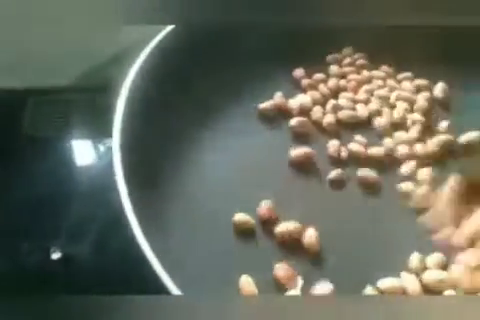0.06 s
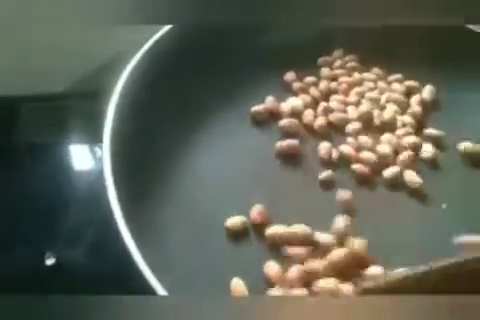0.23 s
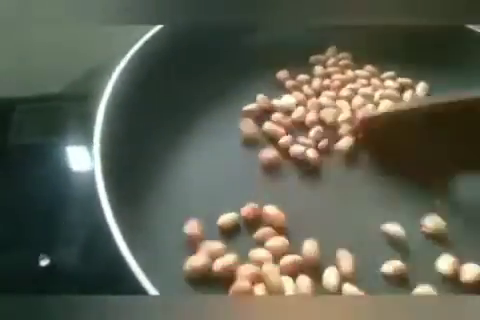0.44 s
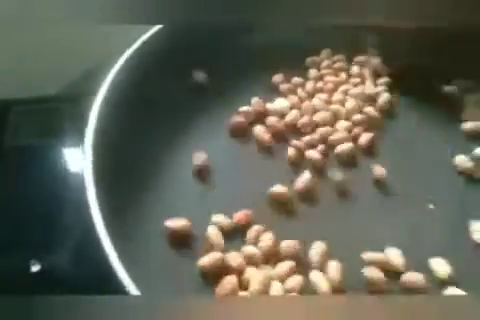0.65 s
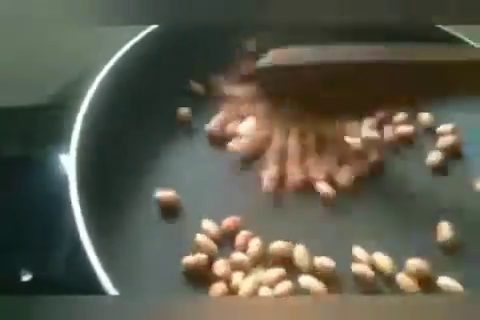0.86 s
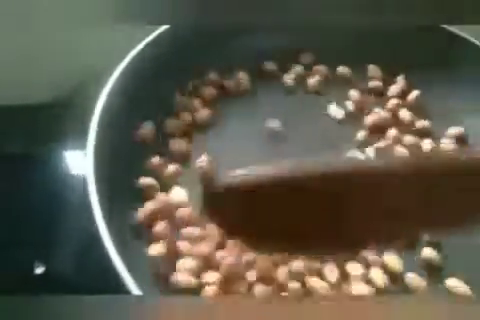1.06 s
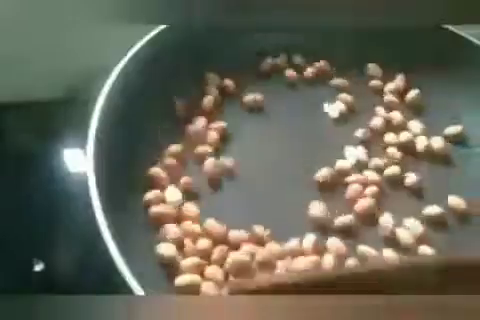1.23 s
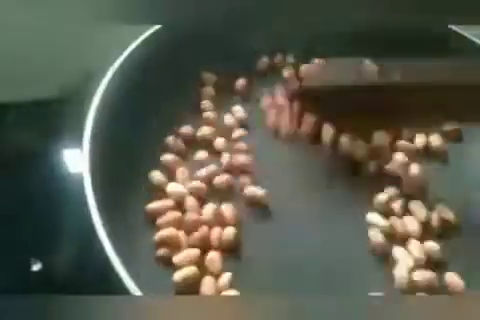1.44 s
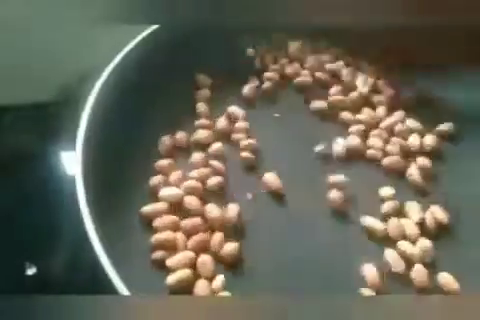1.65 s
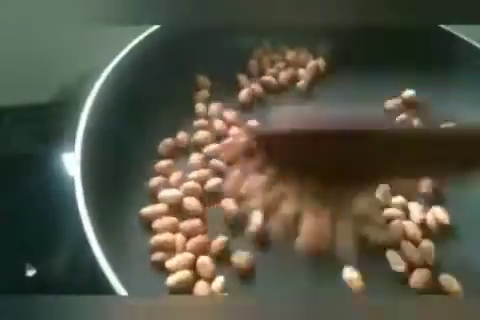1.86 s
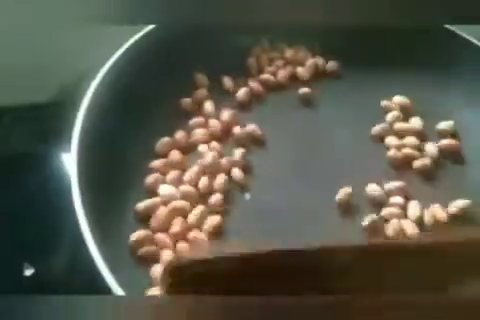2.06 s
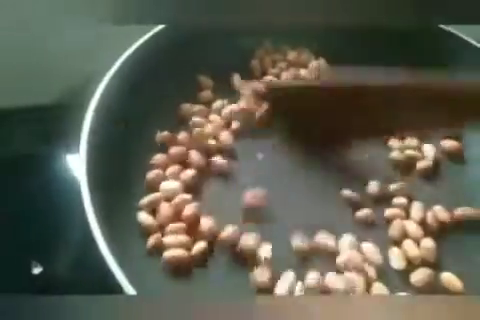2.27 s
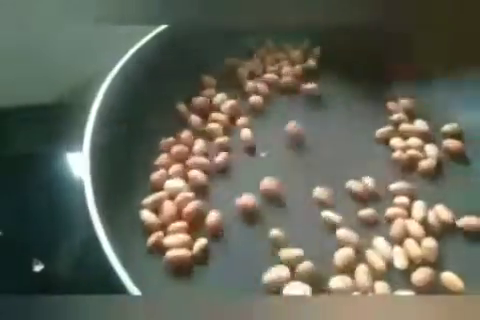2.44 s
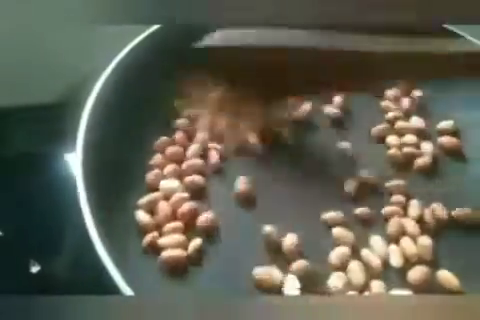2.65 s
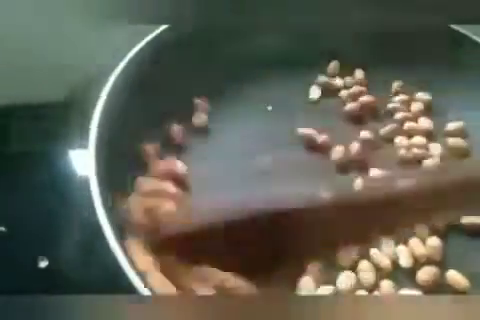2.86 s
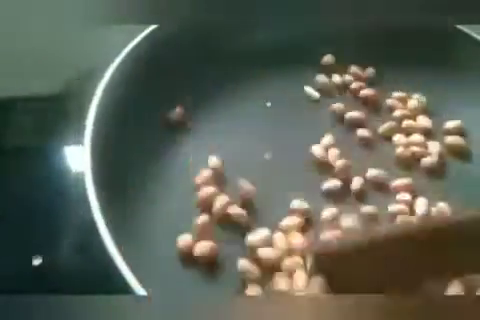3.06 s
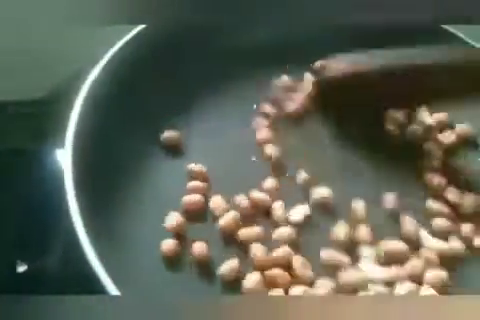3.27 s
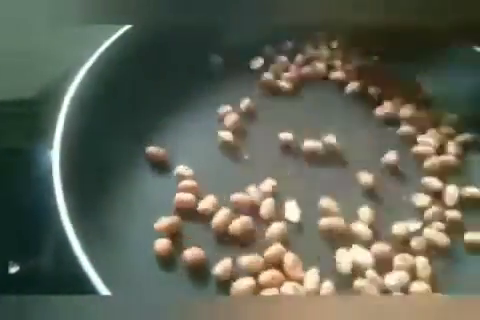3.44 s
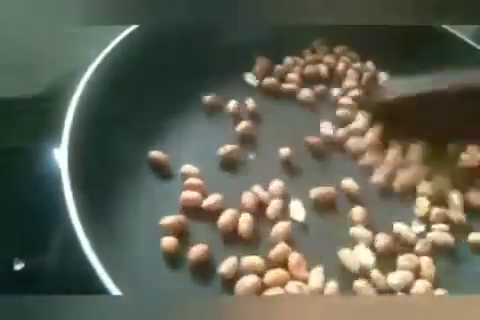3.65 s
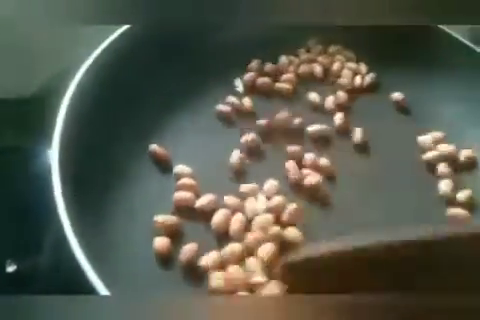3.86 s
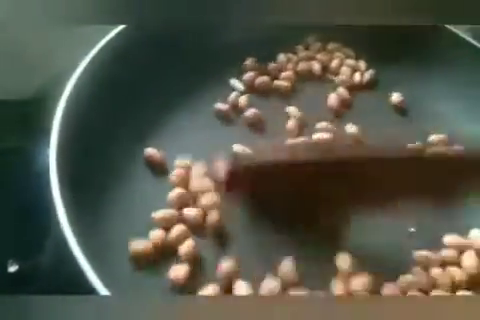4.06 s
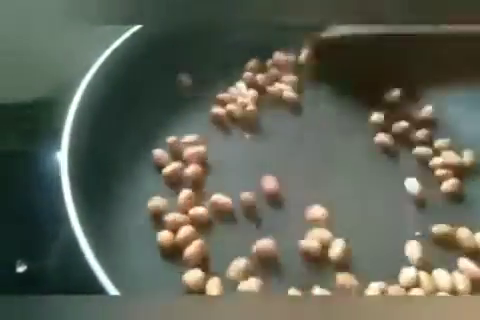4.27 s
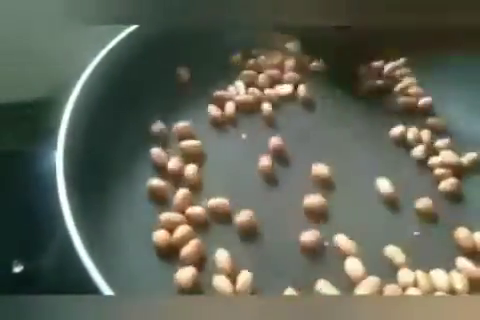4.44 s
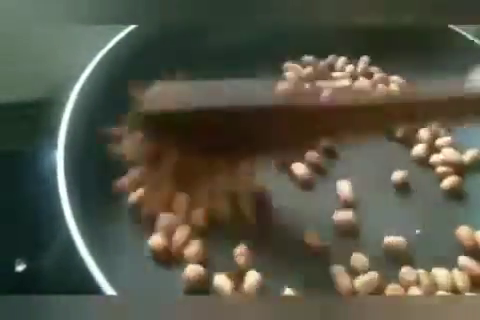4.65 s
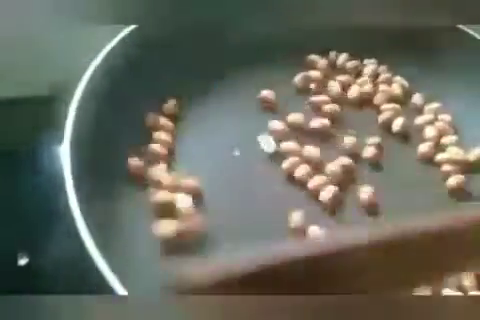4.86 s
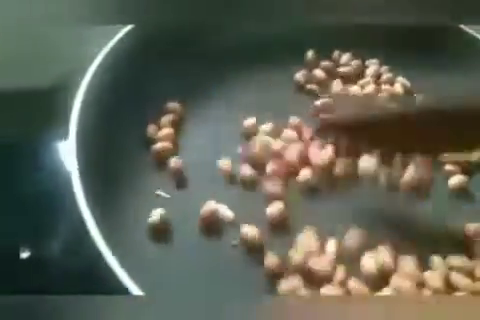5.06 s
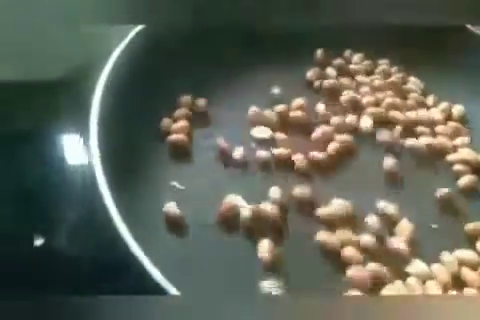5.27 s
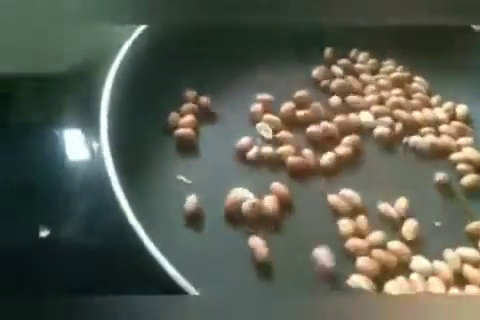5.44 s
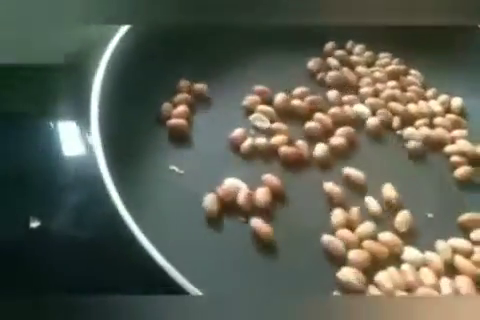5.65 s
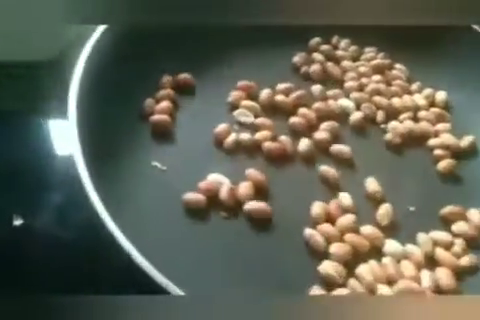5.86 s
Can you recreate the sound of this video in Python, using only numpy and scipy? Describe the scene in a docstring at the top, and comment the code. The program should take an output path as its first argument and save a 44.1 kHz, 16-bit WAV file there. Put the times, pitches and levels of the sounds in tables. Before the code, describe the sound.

Heard very close in a small kitchen: roasting nuts scrape, rustle and rattle over a metal pan in regular quick strokes. The blade knocks and clonks on the pan wall, with tiny squeaks, bright ticks and faint pings, while the pan grumbles low on the hob. At the end the clatter thins, cuts off, and a single light nut taps several times before near silence.

```python
"""Peanuts roast in a coated frying pan: from the start a spatula strokes them about twice a second.
Each stroke scrapes with fine hiss and husk rustle, then the heap topples in a clatter of ringing contacts.
Along the way the blade knocks, bangs and pings the pan, skids squeak or tick and the pan grumbles on the hob.
The stirring ends, the tumbling is cut off and a last nut bounces. Small kitchen, heard close.
Noise bursts and damped sines make the contacts, random impulses repeat them, and a short reverb follows."""
import sys
import numpy as np
from scipy import signal
from scipy.fft import rfft, irfft, next_fast_len
from scipy.io import wavfile
from scipy.ndimage import uniform_filter1d, map_coordinates

SR = 44100
rng = np.random.default_rng(int(sys.argv[2]) if len(sys.argv) > 2 else 0)


def put_to_file(sound):
    """Save the sound as 16-bit audio at rate SR, in the file named by the first command-line argument."""
    columns = np.atleast_2d(sound).T  # one column per channel
    safe = np.clip(columns, -1, 1)
    whole_steps = np.round(safe * 32767)
    wavfile.write(sys.argv[1], SR, whole_steps.astype(np.int16))


N = 260631  # length [samples]


def amp(db):
    """Decibels to gain."""
    return 10 ** (np.asarray(db) / 20)


def unit(x):
    """Scale to rms 1."""
    return x / np.sqrt(np.mean(x ** 2) + 1e-20)


def together(levels_db):
    """Level of several sounds heard at once, summed as powers [dB]."""
    power = np.sum(amp(levels_db) ** 2, axis=0)
    return 10 * np.log10(power + 1e-12)


def along(points, hz):
    """Read (frequency [Hz], value) points on a log frequency axis."""
    f, value = np.transpose(points)
    return np.interp(np.log(hz + 1), np.log(f + 1), value)


def wobble(rate):
    """A smooth random curve with rate knots a second."""
    knots = rng.standard_normal(int(N * rate / SR) + 4)
    return map_coordinates(knots, [np.arange(N) * rate / SR])


def swell(start, hold, rise_db_per_s, fall_db_per_s):
    """An envelope in dB that climbs to 0 at start [s], holds [s] and falls."""
    t = np.arange(N) / SR - start
    rise = rise_db_per_s * t
    fall = fall_db_per_s * (hold - t)
    return np.minimum(0, np.minimum(rise, fall))


def coloured(x, spectrum):
    """Minimum-phase filter with the gain of (frequency [Hz], gain [dB]) points: no pre-echo."""
    n = x.shape[-1]
    m = 2 * next_fast_len(n // 2 + 2048)
    gain = amp(along(spectrum, np.fft.rfftfreq(m, 1 / SR)))
    cepstrum = irfft(np.log(gain))
    cepstrum[1:m // 2] *= 2  # fold the cepstrum onto positive time
    cepstrum[m // 2 + 1:] = 0
    return irfft(rfft(x, m) * np.exp(rfft(cepstrum)))[..., :n]


def add(track, s, sound):
    """Mix a sound into the track from time s."""
    part = track[max(round(s * SR), 0):][:len(sound)]
    part += sound[:len(part)]


def ring_time():
    """Time axis of one blow, 0.2 s."""
    return np.arange(SR // 5) / SR


def burst(t60):
    """Noise of energy 1 that dies away by 60 dB in t60 [s]."""
    t = ring_time()
    x = rng.standard_normal(len(t)) * amp(-60 * t / t60)
    return x / np.linalg.norm(x)


def ring(modes, scatter_db, detune=0.0037):
    """Damped modes, each with a new strength and sign; the load of the nuts detunes them a little."""
    t = ring_time()
    hz, db, t60 = np.transpose(modes)[:, :, None]
    sign = rng.choice([-1, 1], hz.shape)
    gain = sign * amp(db + scatter_db * rng.standard_normal(hz.shape))
    hz = hz * (1 + detune * rng.standard_normal(hz.shape))
    return np.sum(gain * np.sin(2 * np.pi * hz * t) * amp(-60 * t / t60), axis=0)


def strike(modes, spectrum, click_t60, ring_db, snap):
    """A blow of energy 1 at one spot of the pan: a first snap, a short clatter and the ring."""
    tone = ring(modes, scatter_db=3.5, detune=0.01215)
    blow = burst(click_t60) + amp(ring_db) * tone / np.linalg.norm(tone)
    blow[0] += snap
    blow = coloured(blow, spectrum)
    return blow / np.linalg.norm(blow)


def contacts(rate, spread_db):
    """Random impulses of uneven size and mean power 1, rate a second."""
    size = unit(amp(spread_db * np.clip(rng.standard_normal(N), -2, 2)))
    chance = np.clip(rate / SR, 1e-6, 1)
    happens = rng.random(N) < chance
    return happens * size * rng.choice([-1, 1], N) / np.sqrt(chance)


def wandering(rate, depth_db, count):
    """The action moves between spots of the pan: one gain curve for each, total power 1."""
    knots = amp(depth_db * rng.standard_normal((count, int(N * rate / SR) + 2)))
    at = np.arange(N) * rate / SR
    gains = np.array([np.interp(at, np.arange(len(k)), k) for k in knots])
    return gains / np.linalg.norm(gains, axis=0)


# resonance of the finest hiss: height [dB], half width [Hz]
FINE_PEAK_DB, FINE_WIDTH_HZ = 1.5, 1200


def shifting(x, patchy_db, centre_hz=None):
    """The colour changes as the contact moves: random gain patches and, if centred, a moving resonance."""
    hz, t, z = signal.stft(x, SR, nperseg=512)
    field = rng.standard_normal(z.shape)
    for _ in range(2):
        field = uniform_filter1d(field, size=5, axis=0)
        field = uniform_filter1d(field, size=11, axis=1)
    gain_db = patchy_db * unit(field)
    if centre_hz is not None:
        centre = np.interp(t, np.arange(N) / SR, centre_hz)
        gain_db = gain_db + FINE_PEAK_DB / (1 + ((hz[:, None] - centre) / FINE_WIDTH_HZ) ** 2)
    return signal.istft(z * unit(amp(gain_db)), SR, nperseg=512)[1][:N]


# colour of the kitchen's background: (frequency [Hz], gain [dB])
KITCHEN_COLOUR = [(25, -30), (72, 6), (100, 6.5), (140, 0.5), (215, 11.5), (310, -2.5), (430, -20.5),
                  (1000, -34), (4000, -25.5), (16000, -23)]


def kitchen_tone():
    """A steady bed of noise, strongest in the lows."""
    return amp(-54.0) * unit(coloured(rng.standard_normal(N), KITCHEN_COLOUR))


# reverberation of the kitchen: (frequency [Hz], t60 [s])
KITCHEN_REVERB = [(200, 0.63), (1500, 0.2), (10000, 0.089)]


def room(x):
    """The kitchen's short reverberation, duller as it fades: decaying noise convolved with the sound."""
    hz, t, z = signal.stft(rng.standard_normal(SR // 2), SR, nperseg=256)
    t60 = along(KITCHEN_REVERB, hz)[:, None]
    tail = signal.istft(z * amp(-60 * t / t60), SR, nperseg=256)[1]
    return signal.oaconvolve(x, tail / np.linalg.norm(tail))[:N]


# colour of the pan grumbling on the hob: (frequency [Hz], gain [dB])
GRUMBLE_COLOUR = [(25, -32.5), (45, -36.5), (85, -10.5), (115, -9.5), (150, -22), (195, -2.5), (232, 3),
                  (275, -3.5), (320, 2), (410, -13.5), (600, -6.5), (1200, -23)]
# colour of the pan rubbing on the hob: (frequency [Hz], gain [dB])
RUB_COLOUR = [(40, -42), (90, -12.5), (135, -6.5), (170, -10.5), (200, 3.5), (235, 1.5), (275, -1.5),
              (320, 1.5), (440, -14), (620, -11.5), (1500, -38)]
# the pan is shoved a little way over the hob: (time [s], length [s], level [dB])
SHOVE = (3.44, 0.165, -37)
SHOVE_EDGE_DB_PER_S = 600
DRAG_DB, DRAG_FOLLOWS = -49, 0.8  # grumble at median sliding [dB]; dB gained for each dB of sliding


def dragging(slide_db):
    """The pan grumbles unevenly on the hob under each stroke, and rubs with a soft low hum when shoved."""
    s, length, shove_db = SHOVE
    stroke_db = DRAG_DB + DRAG_FOLLOWS * (slide_db - np.median(slide_db))
    grumble = unit(coloured(contacts(400, spread_db=3.5), GRUMBLE_COLOUR))
    rub = unit(coloured(contacts(1500, spread_db=1.5), RUB_COLOUR))
    shove = swell(s, length, SHOVE_EDGE_DB_PER_S, SHOVE_EDGE_DB_PER_S)
    return amp(stroke_db + 3.4 * wobble(25)) * grumble + amp(shove_db + shove) * rub


# brief squeaky skids and pitched ticks: (middle [s], level [dB], centre [Hz],
# width at half amplitude [Hz], half length [s], left-right difference [dB])
SKIDS_AND_TICKS = [(0.136, -23, 13700, 1490, 0.0021, -7.5), (0.42, -24.5, 5100, 502, 0.0025, -52),
                   (1.5, -24, 3250, 300, 0.0041, -56), (1.929, -25.5, 5930, 4980, 0.0036, -55),
                   (1.941, -28, 4900, 4430, 0.0041, -56), (1.963, -31.5, 13180, 4000, 0.0023, -27),
                   (2.009, -22, 8860, 1400, .0037, -57), (2.619, -26, 13000, 6000, 0.00082, -31),
                   (2.835, -28.5, 7000, 3510, 0.0031, -49), (2.917, -28, 7700, 1203, 0.0012, -51),
                   (3.442, -31, 8450, 2520, 0.0025, -48), (3.744, -32.5, 12000, 2500, 0.0046, -29),
                   (4.333, -25.5, 12200, 6000, 0.00069, 2.5), (4.359, -25, 9100, 3530, 0.007, 2),
                   (4.816, -26, 7000, 3940, 0.0019, -50), (4.963, -30.5, 7930, 3110, 0.0045, -50)]


def skids_and_ticks():
    """Brief squeaky skids and pitched ticks, as milliseconds of band noise: mid and side."""
    mid, side, t = np.zeros(N), np.zeros(N), ring_time()
    f, middle = np.fft.rfftfreq(len(t), 1 / SR), t.mean()
    for s, db, hz, width_hz, length, side_db in SKIDS_AND_TICKS:
        band = 1 / (1 + (2 * (f - hz) / width_hz) ** 2)
        noise = rng.standard_normal((2, len(t)))
        chirp = unit(irfft(rfft(noise) * band, len(t)))
        chirp = chirp * amp(db) * np.exp(-((t - middle) / length) ** 2 / 2)
        add(mid, s - middle, chirp[0])
        add(side, s - middle, amp(side_db) * chirp[1])
    return mid, side


# high modes of the pan wall: (frequency [Hz], level [dB], t60 [s])
RIM_MODES = [(2686, 0.5, 0.059), (3303, 0.5, 0.13), (4040, -3, 0.092), (4790, -14.5, 0.15),
             (5480, -2.5, 0.14), (6260, 1, 0.15), (7170, 2, 0.12), (8440, 3, 0.13), (9300, -3, 0.13),
             (10200, -4, 0.15)]
# the spatula's edge clips the pan wall: (time [s], level [dB], tilt about 6 kHz [dB per octave])
PINGS = [(1.172, -48.5, 0), (2.005, -38, -6.5), (2.829, -46.5, -5), (3.59, -40, 1.5)]
# ring added while the edge bites [dB relative to the ring], and its time constant [s]
PING_BITE_DB, PING_BITE_S = 9, 0.004


def pings():
    """The wall's high modes sound loudly while the edge bites, then ring on thinly."""
    out, t = np.zeros(N), ring_time()
    bite = 1 + amp(PING_BITE_DB) * np.exp(-t / PING_BITE_S)
    for s, db, tilt_db in PINGS:
        modes = [(hz, level + tilt_db * np.log2(hz / 6000), t60) for hz, level, t60 in RIM_MODES]
        add(out, s, amp(db) * bite * ring(modes, scatter_db=3.5, detune=0.0014))
    return out


# modes of the pan: (frequency [Hz], level [dB], t60 [s])
PAN_MODES = [(720, -5, 0.078), (810, -4, 0.063), (903, -6.5, 0.1), (978, -7.5, 0.071), (1069, -11, 0.11),
             (1256, -3.5, 0.067), (1291, 1.5, 0.053), (1446, -5.5, 0.043), (1493, -1.5, 0.12),
             (1534, 1, 0.035), (1975, -7.5, 0.083), (2244, -1, 0.047), (2440, -1, 0.024),
             (2478, -1.5, 0.055), (2750, -4, 0.014), (3270, -1.5, 0.1), (3430, -1, 0.07)]
# colour of the last nut on the pan: (frequency [Hz], gain [dB])
LAST_NUT_COLOUR = [(300, -40), (550, -33), (850, -1), (1200, -7), (1570, 3), (1850, -10), (2250, -2.5),
                   (2750, -14), (3050, -27), (3270, -16.5), (3700, -41), (8000, -28), (16000, -62)]
# the last nut drops and bounces on one spot: (time [s], peak [dB])
BOUNCES = [(5.679, -39), (5.7055, -24.5), (5.727, -26), (5.74, -30), (5.7525, -36)]
# it wobbles between the bounces: (time [s], length [s], level [dB])
ROLL = (5.706, 0.036, -49)
# when the tumbling is cut off, and how fast it and the last nut's wobble are cut
CUT_S, CUT_DB_PER_S = 5.55, 897.5


def last_nut():
    """After a faint tap one light nut bounces ever softer and wobbles, ringing one spot of the pan."""
    blow = strike(PAN_MODES, LAST_NUT_COLOUR, click_t60=0.017, ring_db=-9, snap=1.44)
    s, length, roll_db = ROLL
    hits = contacts(1200, spread_db=0.0) * amp(roll_db + swell(s, length, 4000, CUT_DB_PER_S))
    for s, db in BOUNCES:
        hits[round(s * SR)] += amp(db) / np.abs(blow).max()
    return signal.oaconvolve(hits, blow)[:N]


# spatula set down on the pan: (time [s], wood level [dB], pitch of the tock [Hz], boom level [dB],
# crack level [dB], after-ring level [dB]); the crack is raised 9.5 dB and the thud, which shares
# the boom's level, lowered 1 dB when played
KNOCKS = [(0.577, -22, 694, -29.5, -37.5, -43.5), (1.1832, -19, 717, -27, -30, -31.5),
          (1.6503, -10.5, 717, -25, -14, -44), (3.441, -29, 820, -30.5, -26, -40),
          (3.924, -24, 756, -27, -38, -38.5)]
# modes of the spatula pressed on the pan: (multiple of the tock's pitch, level [dB], t60 [s])
WOOD_MODES = [(0.7, -21.5, 0.05), (1, 1, 0.047), (1.13, -7, 0.038), (1.27, -13.5, 0.038),
              (1.45, -15.5, 0.04), (2.1, -19, .03)]
# modes of the whole pan on the hob: (frequency [Hz], level [dB], t60 [s])
BOOM_MODES = [(204.4, -2, 0.1), (228, 5.5, 0.067), (277, -2.5, 0.086), (334, 0, 0.085), (383, -17, 0.06)]
# low modes that ring on when the spatula rebounds: (frequency [Hz], level [dB], t60 [s])
AFTER_RING_MODES = [(888, 3, 0.23), (1096, 0, 0.25), (1260, -9.5, 0.13)]
# colour of the rebound chatter: (frequency [Hz], gain [dB])
REBOUND_COLOUR = [(150, -28), (420, -11.5), (620, -1), (780, 2.5), (1050, 0.5), (1800, -16), (8000, -48.5)]
# the blade chatters just after landing: delay [s], burst energy before colouring [dB relative to the tock]
REBOUND_S, REBOUND_DB = 0.009, 16
# the pan starts to rock a moment after the tock, and builds up: delay [s], time constant [s]
ROCK_DELAY_S, ROCK_RISE_S = 0.00693, 0.009


def knocks():
    """The spatula lands with a woody tock, pitched by where it lands; the pan rings and rocks on the hob."""
    out, t = np.zeros(N), ring_time()
    crack_colour = [(300, 4.5), (1500, -2.5), (2400, 10), (4000, -3.5), (8000, -2), (16000, -24.5)]
    thud_colour = [(30, -36.5), (130, -16.5), (200, 3.5), (320, 0.5), (420, -3), (750, 2.5),
                   (1200, -10), (4000, -35.5)]
    for s, wood_db, tock_hz, boom_db, crack_db, ring_db in KNOCKS:
        tock = np.zeros(len(t))
        for ratio, db, t60 in WOOD_MODES:
            tock += amp(db - 60 * t / t60) * np.sin(2 * np.pi * ratio * tock_hz * t)
        crack = coloured(burst(0.0086), crack_colour)
        thud = coloured(burst(0.045), thud_colour)
        boom = ring(BOOM_MODES, scatter_db=3.0) * (1 - np.exp(-t / ROCK_RISE_S))
        chatter = coloured(burst(0.025), REBOUND_COLOUR)
        add(out, s, amp(wood_db) * tock)
        add(out, s, amp(crack_db + 9.5) * crack / np.abs(crack).max())
        add(out, s, amp(boom_db - 1.0) * thud / np.abs(thud).max())
        add(out, s + ROCK_DELAY_S, amp(boom_db) * boom)
        add(out, s + REBOUND_S, amp(wood_db + REBOUND_DB) * chatter)
        add(out, s, amp(ring_db) * ring(AFTER_RING_MODES, scatter_db=5.5))
    return coloured(out, [(30, -24), (100, -11.5), (190, 0.5)])  # low cut keeps the knocks from booming


# the blade bangs into the pan wall and chatters against it:
# (time [s], clonk peak [dB], peak of the crunch of trapped nuts [dB])
BANGS = [(0.7966, -1.5, -20), (0.8013, -3.5, -17.5), (0.803, -7, -16.5), (0.8085, -7.5, -13.5),
         (3.5927, -3.5, -15), (3.5982, -12.5, -23.5), (3.602, -12, -24)]
# modes of the wall under the blade: (frequency [Hz], level [dB], t60 [s])
WALL_MODES = [(810, -13.5, 0.035), (1087, 3, 0.11), (1260, 3, .035), (1410, -12.5, .025), (1430, 3, .07),
              (2080, -7.5, .04), (2400, -2.5, .035)]
# colour of the blade on the wall: (frequency [Hz], gain [dB])
BLADE_COLOUR = [(40, -28), (300, -19), (420, -21.5), (600, -5), (1000, -1.5), (1600, 0), (2500, -3),
                (3500, -14), (8000, -38)]
# colour of the crunched nuts: (frequency [Hz], gain [dB])
CRUNCH_COLOUR = [(1200, -27.5), (2500, -3), (3500, 3), (4800, -4), (6500, 8), (8800, -1.5), (11000, -9),
                 (16000, -17.5)]


def bangs():
    """The blade hits the wall: a hollow clonk with the crunch of nuts caught in between."""
    out = np.zeros(N)
    for s, db, crunch_db in BANGS:
        clonk = strike(WALL_MODES, BLADE_COLOUR, click_t60=0.014, ring_db=-4, snap=1.8)
        crunch = strike(RIM_MODES, CRUNCH_COLOUR, click_t60=0.03, ring_db=-13, snap=0.16)
        add(out, s, amp(db) * clonk / np.abs(clonk).max())
        add(out, s, amp(crunch_db) * crunch / np.abs(crunch).max())
    return out


# strokes of the spatula: (start [s], push [s], slide [s], scrape level [dB],
# finest hiss [dB relative to the scrape], centre of that hiss [Hz], delay until the heap topples [s],
# toppling [s], tumble level [dB], its build-up [dB/s], its settling [dB/s]); layers trim these levels
STROKES = [(-0.02, 0.038, 0.55, -29.5, -5, 13500, 0.13, 0.069, -26, 70, 71.5),
           (0.30, 0.0066, 1, -32, -6, 12000, 0.11, 0.09, -24, 89, 74),
           (0.776, 0.0097, 0.3, -29, -10, 14500, 0.051, 0.19, -25, 113, 69),
           (1.193, 0.014, 0.64, -32.5, -5.5, 14800, 0.19, 0.17, -25, 150, 69.5),
           (1.689, 0.047, 0.59, -30, -5, 14000, 0.12, 0.1, -26.5, 85, 80),
           (2.10, 0.018, 0.65, -29.5, -8, 14500, 0.12, 0.1, -25.5, 94, 67),
           (2.535, 0.096, 0.87, -30.5, -7, 12000, 0.12, 0.12, -25.5, 78.5, 71),
           (3.00, 0.1, 0.44, -33.5, -5.5, 14500, 0.15, 0.155, -23, 93, 62),
           (3.497, 0.25, 0.37, -33, -3.5, 13000, 0.16, 0.095, -25, 107, 72),
           (3.975, 0.12, 0.74, -32, -7.5, 14500, 0.15, 0.077, -24.6, 98, 58.5),
           (4.411, 0.27, 0.54, -30.5, -5.5, 12000, 0.15, 0.11, -24.5, 94, 63),
           (4.94, 0.011, 0.29, -32, -7.5, 11500, 0.1, 0.125, -22, 123.5, 66.5)]
PUSH_CURVE = 0.16  # speed grows as this power of the time into the push
DULLING = 0.19  # extra dB of finest hiss lost for each dB that the slide slows


def stirring():
    """Pushes speed the nuts up, friction brakes them, the heap topples: sliding, hiss, tumbling [dB]."""
    t = np.arange(N) / SR
    slides, hisses, tumbles = [], [], []
    for s, push, slide, scrape_db, fine_db, _, delay, toppling, tumble_db, build, settle in STROKES:
        pushed = np.clip((t - s) / push, 0, 1) ** PUSH_CURVE
        braked = np.clip(1 - (t - s - push) / slide, 0, 1)
        speed_db = 20 * np.log10(pushed * braked + 1e-6)
        slides.append(scrape_db + speed_db)
        hisses.append(scrape_db + fine_db + (1 + DULLING) * speed_db)
        tumbles.append(tumble_db + swell(s + delay, toppling, build, settle))
    cut_db = -CUT_DB_PER_S * np.clip(t - CUT_S, 0, 0.1)
    return together(slides), together(hisses), together(tumbles) + cut_db


SOFTENING = 0.11  # extra dB of husk rustle and stray ticks lost for each dB that the tumbling calms
STRAY_DB, STRAY_TREBLE_DB = 4.5, -4  # least peak over the tumbling; brightest tick setting
STRAY_UNTIL_S = 5.1  # random hard contacts end here; the later ones are typed in CLACKS


def strays(tumble_db, count=32):
    """Now and then a nut leaps from the moving heap and lands hard: rows like the clacks."""
    rows = []
    for k, (where, size, edge) in enumerate(rng.random((count, 3))):
        s = (k + where) / count * STRAY_UNTIL_S
        level_db = tumble_db[min(int(s * SR), N - 1)]
        calm_db = SOFTENING * (level_db - tumble_db.max())
        rows.append((s, level_db + STRAY_DB + 5 * size, STRAY_TREBLE_DB - 8 * edge + calm_db))
    return rows


# hard contacts of nuts and spatula with the pan:
# (time [s], body peak [dB], treble tick [dB relative to the body, before a 4 dB lift])
CLACKS = [(0.122, -19, -3), (0.252, -25, -7), (0.329, -16.5, -6), (0.418, -14, -11), (0.423, -11.5, -14.5),
          (0.615, -17.5, -7.5), (0.664, -26, -3), (0.741, -22, -11), (0.788, -15.5, -3),
          (0.906, -18.5, -16), (1.000, -21.5, -4.5), (1.171, -20.5, -9.5), (1.231, -21, -3.5),
          (1.379, -18, -16), (1.479, -24, -22), (1.498, -7.5, -19.5), (1.53, -15, -10.5),
          (1.852, -21.5, -19), (2.022, -17.5, -14), (2.178, -16, -5.5), (2.321, -18, -18),
          (2.339, -10.5, -15.5), (2.35, -20.5, -19), (2.496, -27, -12), (2.523, -13.5, -16),
          (2.658, -13, -16), (2.676, -21, -1), (2.707, -13.5, -18), (2.829, -20.5, -2), (2.988, -23, 1),
          (3.122, -18, -1.5), (3.229, -10.5, -18), (3.2755, -13, -25), (3.347, -23.5, -12), (3.574, -20, 1),
          (3.588, -18, -6.5), (3.678, -14.5, -16), (4.044, -19.5, -5), (4.063, -18, -4), (4.1, -15.5, -6),
          (4.338, -22, -13.5), (4.588, -17, -6), (5.012, -19, -4), (5.057, -14.5, -8), (5.158, -14, -19),
          (5.19, -17, -12), (5.232, -30, -24.5), (5.2664, -21, -18), (5.292, -29, -25), (5.317, -21, -27.5),
          (5.341, -17.5, -29), (5.411, -23, -38), (5.424, -20, -35), (5.449, -30, -35), (5.46, -24.5, -32),
          (5.521, -39, -35), (5.532, -31, -28), (5.557, -37.5, -35)]
# colour of a nut on the pan: (frequency [Hz], gain [dB])
NUT_COLOUR = [(150, -40), (400, -23.5), (540, -18.5), (690, -2), (840, -1.5), (1020, 0.2), (1300, 2),
              (1550, 0.5), (1800, -1.5), (2450, 0.5), (2900, -4.5), (3350, -17), (3800, -24.5), (6000, -42),
              (16000, -77)]
# colour of the bright shell tick: (frequency [Hz], gain [dB])
SHELL_COLOUR = [(1500, -46), (3000, 13.5), (4000, 10.5), (6000, 5), (8500, 9), (11000, -14), (16000, -13.5)]


def clacks(rows):
    """Single hard contacts; each rings the pan and carries a bright tick of its own level."""
    out = np.zeros(N)
    for s, db, treble_db in rows:
        body = strike(PAN_MODES, NUT_COLOUR, click_t60=0.013, ring_db=-7, snap=1.0)
        tick = strike(RIM_MODES, SHELL_COLOUR, click_t60=0.03, ring_db=-5.5, snap=0.22)
        body = coloured(body, [(600, -7.5), (1200, -5.0)])  # hard contacts excite less of the low ring
        add(out, s, amp(db) * body / np.abs(body).max())
        add(out, s, amp(db + treble_db + 4.0) * tick / np.abs(tick).max())
    return out


def ticking(level_db, count=520):
    """Pushed nuts knock against each other; each tick has its own short-lived pitches."""
    out, t = np.zeros(N), np.arange(SR // 40) / SR
    for where, life in rng.random((count, 2)):
        start = int(where * (N - 1))
        hz = np.clip(5400 * np.exp(0.43 * rng.standard_normal((3, 1))), 2200, 14000)
        tick = np.sin(2 * np.pi * hz * t).mean(axis=0)
        tick += 0.2 * rng.standard_normal(len(t))
        t60 = 0.01 + 0.02 * life
        size_db = level_db[start] + 1.0 + 4 * np.clip(rng.standard_normal(), -2, 2)
        add(out, start / SR, tick * amp(size_db - 60 * t / t60))
    return out


# colour of the scrape over the coating: (frequency [Hz], gain [dB])
HISS_COLOUR = [(300, -23.5), (430, -15.5), (600, -1), (700, 3), (2500, -0.5), (3800, -8.5), (5000, -7),
               (6200, -4.5), (6600, 0.5), (7100, 2.5), (7800, 2), (8400, 1), (9600, 1), (11000, -10.5),
               (13000, -26.5), (16000, -34)]
# colour of the finest hiss: (frequency [Hz], gain [dB])
FINE_COLOUR = [(8000, -23), (10500, 3), (11800, 4), (13000, 0), (15500, 4), (16500, 4)]
# colour of the dry husks: (frequency [Hz], gain [dB])
HUSK_COLOUR = [(1500, -43), (2800, -2.5), (3500, 2), (4200, 1.5), (4900, -10), (5700, 3.5), (7000, -6),
               (10000, -25), (16000, -50)]
HUSK_SLIDE_DB, HUSK_TUMBLE_DB = -14.5, -17.5  # husk rustle relative to the sliding and to the tumbling


def scraping(slide_db, fine_db, tumble_db, count=10):
    """Sliding over the grainy coating makes thousands of tiny slips a second; the dry husks rustle along."""
    coarse, fine = np.zeros(N), np.zeros(N)
    for share in wandering(rate=9, depth_db=3.5, count=count):
        slips = contacts(600, spread_db=4.0) * share
        grain = strike(RIM_MODES, HISS_COLOUR, click_t60=0.015, ring_db=-12.0, snap=0.44)
        coarse += signal.oaconvolve(slips, grain)[:N]
        fine += signal.oaconvolve(slips, burst(0.0073))[:N]
    rolling_db = tumble_db + SOFTENING * (tumble_db - tumble_db.max())
    coarse = shifting(coarse, patchy_db=2.5)
    coarse *= amp(together([slide_db - 0.78, rolling_db - 23.0]))
    # the hiss resonance glides from stroke to stroke
    push_ends = [row[0] + row[1] for row in STROKES]
    centre_hz = np.interp(np.arange(N) / SR, push_ends, [row[5] for row in STROKES])
    fine = unit(shifting(coloured(fine, FINE_COLOUR), patchy_db=3.5, centre_hz=centre_hz))
    fine *= amp(fine_db + 1.5 + 1.3 * wobble(60))
    # dry skins crackle
    crumbs = signal.oaconvolve(contacts(460, spread_db=5.5), burst(0.019))[:N]
    husks = unit(shifting(coloured(crumbs, HUSK_COLOUR), patchy_db=5.5))
    husks *= amp(together([slide_db + HUSK_SLIDE_DB, rolling_db + HUSK_TUMBLE_DB]))
    flutter = amp(0.71 * wobble(130) + 0.56 * wobble(22))
    return flutter * (coarse + fine + husks)


CALM_DULLING = 0.14  # dB of treble lost for each dB that the tumbling falls below its livelier moments


def tumbling(level_db, count=18):
    """Nuts land on many spots of the pan; a livelier heap makes more contacts and sounds brighter."""
    rate = 720 * amp(0.77 * (level_db - level_db.max())) + 160  # contacts a second over the whole pan
    out = np.zeros(N)
    for share in wandering(rate=9, depth_db=3.5, count=count):
        hits = contacts(rate * share ** 2, spread_db=4.5) * share * amp(level_db - 3.0)
        landing = strike(PAN_MODES, NUT_COLOUR, click_t60=0.012, ring_db=-7.0, snap=0.7)
        out += signal.oaconvolve(hits, landing)[:N]
    out = shifting(out, patchy_db=2.5)
    dull = signal.sosfiltfilt(signal.butter(2, 1800, fs=SR, output="sos"), out)
    calm_db = np.clip(level_db - np.percentile(level_db, 70), -25, 0)
    bright = amp(2.28 * wobble(30) + CALM_DULLING * calm_db)
    return dull + (out - dull) * bright


def scene():
    """The pan sits straight ahead; only a few skids and ticks spread sideways."""
    slide_db, fine_db, tumble_db = stirring()
    skids, wide = skids_and_ticks()
    nuts = tumbling(tumble_db) + ticking(slide_db) + scraping(slide_db, fine_db, tumble_db)
    nuts += clacks(CLACKS + strays(tumble_db)) + last_nut()
    pan = nuts + dragging(slide_db) + knocks() + bangs() + pings() + skids
    mid = pan + amp(-8.5) * room(pan) + kitchen_tone()
    return np.array([mid + wide, mid - wide])


def gate(x, threshold_db, knee_db, depth_db):
    """A soft noise gate, keyed by the left channel, turns down what falls below the threshold."""
    power = uniform_filter1d(x[0] ** 2, size=700)
    level_db = 10 * np.log10(np.abs(power) + 1e-12)
    shut = np.clip((threshold_db - level_db) / knee_db, 0, 1)
    return x * amp(-depth_db * uniform_filter1d(shut, size=180))


TREBLE_HZ, TOP_HZ = 3550, 15950  # split between the two gates; upper band limit


def record(dry):
    """The lower range and the treble are gated separately, and a steep filter ends the band at the top."""
    m = next_fast_len(N + SR // 2)
    hz = np.fft.rfftfreq(m, 1 / SR)
    low = irfft(rfft(dry, m) / (1 + (hz / TREBLE_HZ) ** 60), m)[:, :N]
    body = gate(low, threshold_db=-47, knee_db=3, depth_db=7)
    treble = gate(dry - low, threshold_db=-48, knee_db=14, depth_db=16)
    return irfft(rfft(body + treble, m) / (1 + (hz / TOP_HZ) ** 300), m)[:, :N]


dry = scene()
out = record(dry)
put_to_file(out)
```